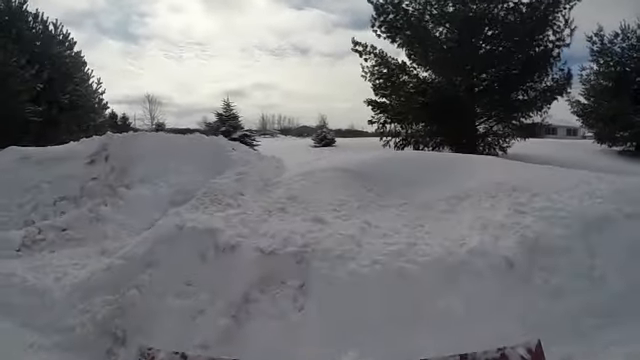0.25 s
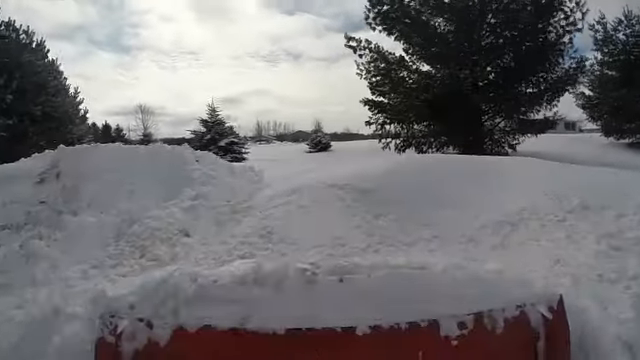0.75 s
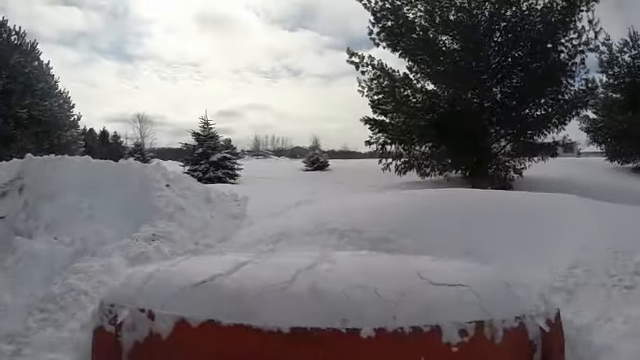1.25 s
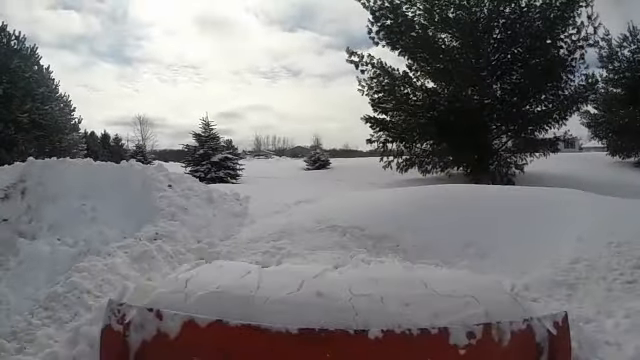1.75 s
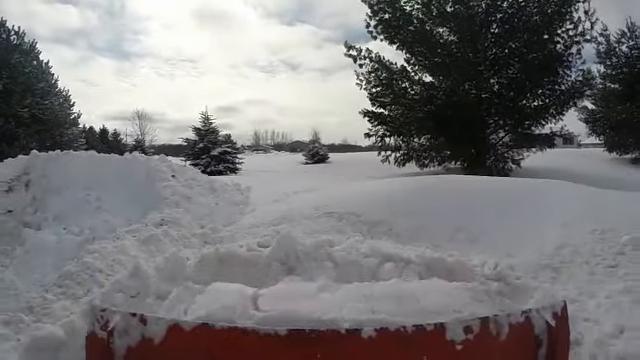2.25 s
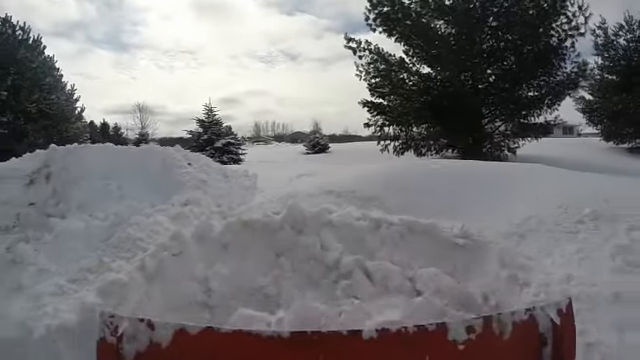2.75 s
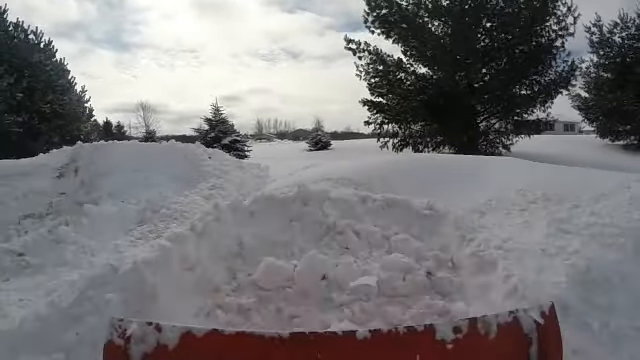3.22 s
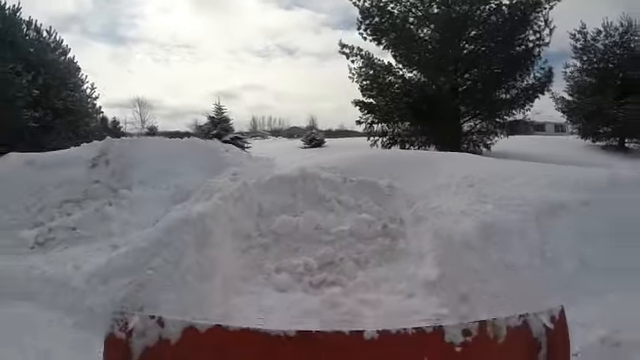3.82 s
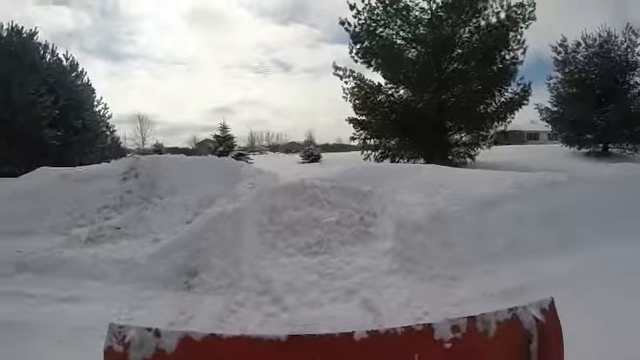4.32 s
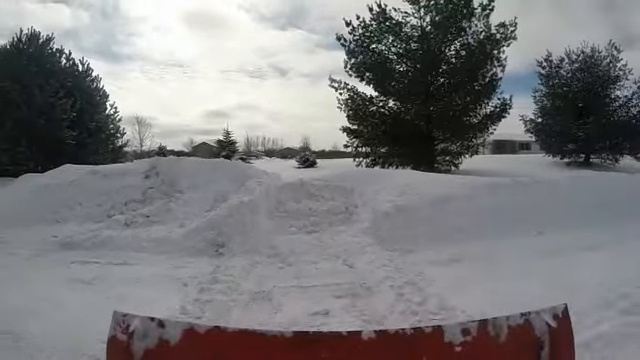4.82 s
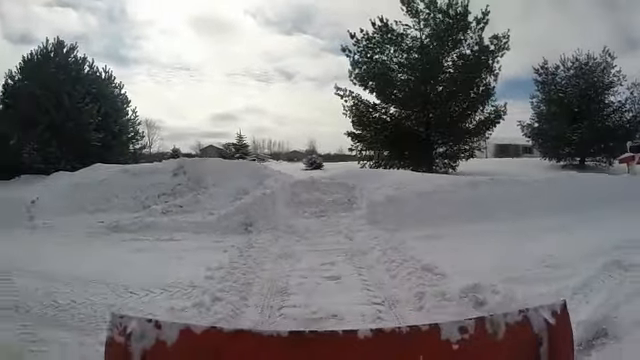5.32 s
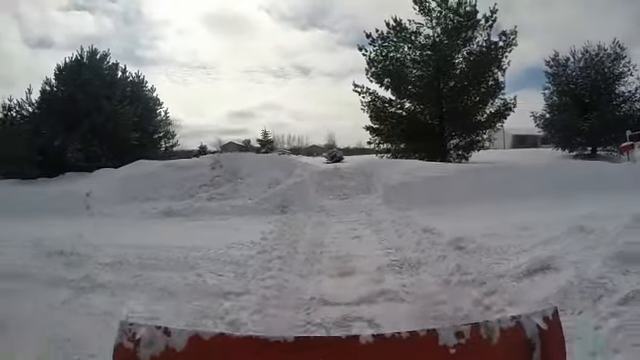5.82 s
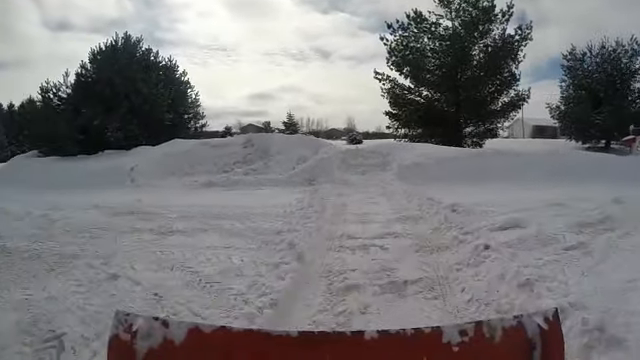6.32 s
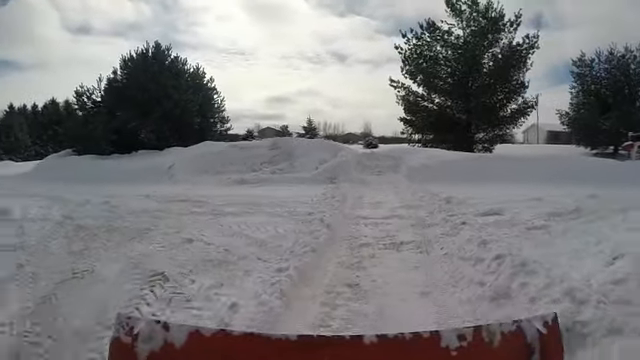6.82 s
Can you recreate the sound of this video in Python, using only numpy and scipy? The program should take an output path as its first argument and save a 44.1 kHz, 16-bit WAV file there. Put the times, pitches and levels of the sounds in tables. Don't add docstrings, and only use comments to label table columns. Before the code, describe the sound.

Continuous diesel drone, close and muffled, with a boomy low end and gritty steel rattle that surges over ruts. A faint narrow hydraulic tone swells now and then. Metal knocks and brief linkage clatter scatter throughout, a few small tinks come early, and dry housing cracks grow denser midway as the machine halts, before it reverses over the snowy lot.

```python
import sys
import numpy as np
from scipy import signal
from scipy.fft import rfft, irfft, next_fast_len
from scipy.io import wavfile
from scipy.ndimage import uniform_filter1d, map_coordinates

SR = 44100
rng = np.random.default_rng(int(sys.argv[2]) if len(sys.argv) > 2 else 0)


def nominal_scale(level):
    x = np.asarray(level, float) / 20
    return 10 ** x


def transcribe(u):
    v = np.clip(np.atleast_2d(u).T, -1, 1)
    q = np.round(v * 32767).astype(np.int16)
    wavfile.write(sys.argv[1], SR, q)


N = 311346
T = np.arange(N) / SR


def unit(x):
    return x / np.sqrt(np.mean(np.abs(x) ** 2) + 1e-20)


def noise():
    return rng.standard_normal(N)


def shape(points):
    hz_points, db_points = np.transpose(points)
    return lambda hz: nominal_scale(np.interp(np.log(hz + 1), np.log(hz_points + 1), db_points))


def modes(table):
    def response(f):
        total = 0
        for k, (centre, width, db) in enumerate(table):
            damping = 1j * f * width
            total = total + (-1) ** k * nominal_scale(db) * damping / (centre * centre - f * f + damping)
        return total
    return response


def filtered(x, response):
    m = next_fast_len(N + SR // 2)
    return unit(irfft(rfft(x, m) * response(np.fft.rfftfreq(m, 1 / SR)), m)[:N])


def wobble(rate):
    return map_coordinates(rng.standard_normal(int(N * rate / SR) + 4), [T * rate])


def swells(rows, rest_db, fall_share):
    total = nominal_scale(rest_db)
    for s, db, half_width in rows:
        width = half_width * np.where(T > s, fall_share, 1)
        total = total + nominal_scale(db) * np.exp(-((T - s) / width) ** 2)
    return 20 * np.log10(total)


def bursts(times, db, t60, rise):
    t = np.arange(SR // 8) / SR
    places = np.minimum(np.round(np.asarray(times) * SR).astype(int), N - 1)
    hits = np.bincount(places, nominal_scale(db), N)
    decay = nominal_scale(-60 * t / t60) * (1 - np.exp(-t / rise))
    return np.abs(signal.fftconvolve(hits, decay)[:N])


def clicks(times, db, colour):
    hits = np.bincount(np.round(np.asarray(times) * SR).astype(int), nominal_scale(db), N)
    out = filtered(hits, shape(colour))
    return out * np.max(np.abs(hits)) / np.max(np.abs(out))


# (time [s], shaft speed [Hz], load [dB], grip of the cab mounts [dB])
ENGINE_RUN = [(0.0, 23.22, 2, -8.5), (0.5, 23.03, 0.5, -11), (0.88, 22.64, 1, -6), (1.1, 22.14, 1.5, -7.5),
              (1.35, 22.37, 2, 2.5), (1.8, 23.43, -1, 2), (2.05, 23.04, -2.5, 6.5), (2.42, 21.51, -1, 0.5),
              (2.7, 21.96, 2, 7.5), (3.08, 21.73, -1, 3), (3.5, 22.01, 1.5, 4.5), (3.96, 21.9, -4, 1),
              (4.4, 22.5, -1, 7.5), (5.0, 22.74, -1, -2), (5.45, 22.62, 2.5, -6), (5.75, 22.55, -3.5, 5),
              (6.3, 22.65, -0.5, 2), (7.06, 22.95, 2, -6)]


def engine():
    s, *columns = np.transpose(ENGINE_RUN)
    return [np.interp(T, s, column) for column in columns]


def crank():
    return np.cumsum(engine()[0]) / SR


def each_turn(angle, per):
    return np.flatnonzero(np.diff(np.floor(per * (crank() - angle)))) / SR


# (time [s], peak level [dB], half width [s])
RUTS = [(0.06, -22.5, 0.25), (0.41, -21, 0.047), (0.59, -23, 0.042), (0.84, -22.5, 0.12),
        (1.08, -30, 0.047), (1.24, -20.5, 0.08), (1.62, -25.5, 0.059), (1.79, -21.5, 0.059),
        (1.99, -26, 0.16), (2.21, -18, 0.023), (2.37, -24, 0.13), (2.65, -33.5, 0.038), (3.04, -22, 0.1),
        (3.36, -26.5, 0.094), (3.58, -22.5, 0.027), (3.79, -19.5, 0.017), (4.0, -23, 0.029),
        (4.23, -20.5, 0.084), (4.47, -27.5, 0.089), (4.64, -18.5, 0.03), (4.8, -24.5, 0.067),
        (5.04, -25, 0.1), (5.2, -33.5, 0.028), (5.37, -22.5, 0.034), (5.71, -18.5, 0.12), (6.02, -19, 0.14),
        (6.28, -24, 0.093), (6.66, -22.5, 0.043), (6.85, -20, 0.12), (7.05, -18.5, 0.033)]


def rut_surge():
    return swells(RUTS, rest_db=-28, fall_share=0.73)


# (frequency [Hz], width [Hz], level [dB])
PANEL_MODES = [(766, 29, -7.5), (837, 29, -2.5), (933, 36, 1), (1164, 27, -2), (1280, 109, 0),
               (1422, 66, 0), (1505, 19, 0.5), (1814, 72, -1.5), (1959, 46, 1.5), (2198, 49, -5.5),
               (2365, 83, -10.5), (2650, 29, -10), (2770, 20, -7), (3004, 100, -16.5), (3499, 65, -14),
               (3750, 70, -22.5)]
# (frequency [Hz], level [dB])
HOUSING_LOSS = [(300, -35.5), (550, -5.5), (750, -0.5), (4000, -1.5), (6300, -5), (6600, -19),
                (9000, -43.5), (16000, -80)]


def panels_heard(f):
    return modes(PANEL_MODES)(f) * shape(HOUSING_LOSS)(f)


# (frequency [Hz], level [dB per Hz])
HOUSING_AIR = [(5000, -40.5), (6500, 2.5), (7500, -2.5), (9000, -6), (10200, -1.5), (11000, -17.5),
               (13000, -21), (14500, -30.5), (16500, -42)]


def housing_hiss():
    return filtered(noise(), shape(HOUSING_AIR))


# (time [s], peak level [dB], half width [s])
DRONE_SWELLS = [
    (1.15, -30.5, 0.19),
    (2.15, -26.5, .15),
    (3.0, -31.5, .3),
    (4.95, -27.5, .3),
    (5.95, -29, 0.36),
    (6.85, -24.5, 0.23),
]


def drone():
    tone = np.sin(2 * np.pi * 296 * T + 1.46 * wobble(5))
    return nominal_scale(swells(DRONE_SWELLS, -40, 0.91) + 2) * tone


# (time [s], peak level [dB], ticks in a row [count])
MOUNT_TICKS = [(0.0488, -46, 1), (0.1346, -49.5, 1), (0.4703, -40, 1), (0.5492, -47, 1), (0.6828, -50, 1),
               (0.9103, -43.5, 4), (1.0914, -42, 1), (1.1368, -42.5, 4), (1.3404, -44.5, 1),
               (1.5513, -46.5, 1), (1.8731, -41.5, 1), (2.185, -42.5, 1), (2.3461, -46.5, 1),
               (2.4129, -44, 1), (3.192, -45.5, 1), (3.4625, -46, 1), (3.601, -41, 1), (3.7813, -48, 1),
               (3.8701, -46, 1), (3.9853, -47, 1), (4.2734, -41.5, 1), (4.3949, -47.5, 1),
               (4.4498, -43.5, 1), (4.4952, -45, 1), (4.5456, -49.5, 1), (5.0095, -45.5, 1),
               (5.1547, -46, 1), (5.6665, -42, 1), (6.4273, -40, 1), (6.5445, -47.5, 1)]


def treble():
    gap_s = .0238
    s, db = np.transpose([(s + k * gap_s, db) for s, db, count in MOUNT_TICKS for k in range(round(count))])
    valve, shake = each_turn(0.086, per=0.87), each_turn(.3, per=5)

    hiss = nominal_scale(-79.5 + 2.5 * wobble(22) + 2.5 * wobble(3.7))
    valve_db = -65 + 3 * rng.standard_normal(len(valve))
    hiss = hiss + bursts(valve, valve_db, t60=0.076, rise=.001)

    shake_db = -71 + 5 * rng.standard_normal(len(shake))
    crackle = bursts(shake + rng.uniform(0, .008, len(shake)), shake_db, t60=0.018, rise=.0002)
    tick = nominal_scale(-4.0) * bursts(s, db, t60=0.0077, rise=0.00012) + crackle
    tick_colour = shape([(5000, -32.0), (7000, -3.5), (10000, 1.5), (13000, -7.5), (16000, -19)])
    return hiss * housing_hiss() + tick * filtered(noise(), tick_colour)


# (time [s], peak level
# [dB])
DRY_SNAPS = [(0.0159, -49), (0.0488, -54.5), (0.1356, -65), (0.1511, -61), (0.3092, -69.5),
             (0.3242, -64), (0.3825, -56.5), (0.4698, -50), (0.5157, -56), (0.5492, -48.5),
             (0.6828, -47.5), (0.7163, -50), (0.9103, -54), (0.9338, -50), (0.9592, -54.5),
             (0.9822, -53), (1.0166, -56), (1.0774, -65), (1.0909, -53), (1.1129, -56.5), (1.1363, -54),
             (1.1593, -57), (1.1832, -51.5), (1.2361, -59.5), (1.28, -58), (1.3404, -53),
             (1.5504, -50.5), (1.6761, -58), (1.7379, -57), (1.8507, -52), (1.8731, -55),
             (2.1844, -49.5),
             (2.3457, -52.5), (2.3886, -58.5), (2.4126, -57.5), (2.424, -57), (2.436, -52),
             (2.4565, -53), (2.5178, -65), (2.5513, -60), (2.6251, -57.5), (2.6555, -64), (2.685, -57),
             (2.7149, -60), (2.7458, -62.5), (2.7857, -63.5), (2.8516, -57.5), (2.8805, -61),
             (2.885, -52.5), (2.9738, -60.5), (3.0182, -51), (3.0526, -63.5), (3.0985, -59.5),
             (3.122, -61.5), (3.1674, -57.5), (3.1923, -53), (3.2187, -52), (3.2362, -60.5),
             (3.339, -65), (3.3517, -57), (3.3854, -60), (3.4298, -62.5), (3.4622, -53),
             (3.4873, -59.5), (3.5191, -67.5), (3.567, -62), (3.6004, -50), (3.6722, -60),
             (3.7006, -66.5), (3.781, -53.5), (3.8039, -56.5), (3.8528, -52), (3.8703, -56.5),
             (3.9281, -65.5), (3.973, -62.5), (3.985, -57.5), (4.007, -57), (4.0528, -57.5),
             (4.1022, -58.5), (4.1287, -58.5), (4.186, -54.5), (4.2195, -53), (4.2723, -54.5),
             (4.3227, -58), (4.3781, -64.5), (4.3946, -53), (4.4494, -54.5), (4.4734, -60.5),
             (4.4953, -53), (4.5238, -61.5), (4.5452, -62.5), (4.6869, -54),
             (4.6868, -53), (4.72, -60), (4.8534, -48), (4.8869, -55), (4.9173, -61), (5.0206, -51.5),
             (5.054, -54.5), (5.1548, -55), (5.1787, -58.5), (5.3546, -51.5), (5.4167, -54.5),
             (5.4915, -57), (5.5209, -51.5), (5.5543, -54), (5.6102, -62.5), (5.6666, -53),
             (5.6875, -59), (5.7095, -56.5), (5.8432, -66), (6.0213, -53), (6.0547, -60.5),
             (6.1111, -61.5), (6.3884, -58.5), (6.4084, -69), (6.4269, -54.5), (6.4782, -58.5),
             (6.5441, -62.5), (6.5551, -50), (6.6888, -52.5), (6.8629, -60.5), (6.8689, -53.5),
             (7.0225, -51)]


def snaps():
    s, db = np.transpose(DRY_SNAPS + [(0.0005, -39.5)])
    half = each_turn(.2, per=2)
    buzz_db = -62 + 4 * wobble(2.9)[(half * SR).astype(int)] + 3.5 * rng.standard_normal(len(half))
    cracks = clicks(s, db + 16, [(4000, -31), (7000, -6.5), (12000, -3.5), (16500, 0.0)])
    buzz = clicks(half, buzz_db, [(6000, -26.5), (8500, -6), (10200, 3.0), (13000, -3.5), (16000, -23.0)])
    return cracks + buzz


# (time [s], peak level [dB], ringing mode [Hz])
HARD_KNOCKS = [(0.6827, -12, 1880), (0.9242, -22, 1940), (1.0773, -7, 1280), (1.1986, -11, 1260),
               (1.9853, -7, 1404), (2.0257, -10.5, 1215), (2.3649, -9.5, 1960), (2.9561, -13, 1345),
               (3.4809, -16, 1920), (3.5717, -7, 1505), (4.1319, -11, 1970), (4.358, -11, 1300),
               (4.4382, -15, 936.8), (4.6318, -10, 1280), (5.8979, -11, 1950), (5.9543, -10, 1871),
               (6.8667, -10.5, 900), (7.0168, -15, 1218)]
# (time [s], peak level [dB], frequency [Hz], t60 [s])
SMALL_TINKS = [
    (1.615, -19, 2800, .07),
    (1.787, -16, 2900, .012),
    (1.788, -19, 3300, .015),
    (1.985, -26, 3500, .06),
    (1.545, -21, 1500, .05),
]


def knocks():
    out, t = np.zeros(N + SR), np.arange(SR // 8) / SR
    rings = [(s, db - 5, hz, .035) for s, db, hz in HARD_KNOCKS]
    for s, db, hz, t60 in rings + SMALL_TINKS:
        envelope = nominal_scale(db - 60 * t / t60) * (1 - np.exp(-t / 0.00023))
        out[round(s * SR):][:len(t)] += envelope * np.sin(2 * np.pi * hz * t)
    s, db, _ = np.transpose(HARD_KNOCKS)
    puff = filtered(noise(), panels_heard)
    return out[:N] + nominal_scale(-14.5) * bursts(s, db, t60=0.074, rise=0.00055) * puff


# (time [s], peak level [dB])
LINK_LANDINGS = [(0.1546, -19.5), (0.3258, -26), (0.4105, -26.5), (0.4968, -31.5), (0.5433, -21.5),
                 (0.684, -21.5), (0.9832, -28.5), (1.0728, -25.5), (1.209, -28), (1.249, -28), (1.296, -20),
                 (1.341, -22), (1.4303, -24.5), (1.475, -28), (1.7876, -25.5), (1.9884, -28), (2.3037, -31),
                 (2.4426, -23.5), (2.4706, -26), (2.588, -33), (2.628, -24), (2.7652, -26), (3.0394, -26.5),
                 (3.1564, -33), (3.2916, -32.5), (3.3852, -30), (3.4008, -33), (3.4291, -25),
                 (3.4796, -32.5), (3.5658, -28.5), (3.806, -25), (3.8364, -26.5), (3.927, -35.5),
                 (3.9427, -26), (3.9898, -23.5), (4.2193, -24.5), (4.3358, -30.5), (4.951, -28.5),
                 (4.9671, -22), (4.9945, -31.5), (5.011, -19.5), (5.1866, -22.5), (5.3183, -28),
                 (5.3465, -28), (5.4082, -23.5), (5.477, -30), (5.4924, -21.5), (5.5405, -28.5),
                 (5.7239, -21.5), (5.766, -34.5), (5.983, -26), (6.3425, -31), (6.542, -29), (6.577, -23),
                 (6.645, -20), (6.8653, -19.5), (6.9137, -30.5), (6.9987, -33.5)]
# (frequency [Hz], level [dB per Hz])
LINK_STEEL = [(1290, -26.5), (2200, 6.5), (2430, -8), (2900, 1.5), (3180, -8), (3450, 1), (4150, -11.5),
              (4470, -0.5), (4950, -22.5), (5210, -12.5), (5420, -13), (5900, -25), (6300, -23),
              (8190, -57.5), (13900, -120)]


def clatter():
    s, db = np.transpose(LINK_LANDINGS)
    turn = each_turn(0.45, per=1)
    rattle_db = -41 + 5 * np.tanh(rng.standard_normal(len(turn)))
    landing = bursts(s, db, t60=0.039, rise=0.00017)
    bounce = bursts(s + 0.0055, db - 10.5, t60=0.074, rise=0.00071)
    rattle = bursts(turn, rattle_db, t60=0.064, rise=0.00055)
    steel = filtered(noise(), shape(LINK_STEEL)) + nominal_scale(-31.5) * housing_hiss()
    return nominal_scale(-1.5) * (landing + bounce + rattle) * steel


# (time [s], peak level [dB], half width [s])
FRAME_SWELLS = [(0.08, -19, 0.047), (0.22, -20.5, 0.037), (0.48, -15, .05), (0.66, -37, 0.042),
                (0.84, -18, .05), (0.93, -19, .05), (1.09, -20, 0.098), (1.35, -23.5, 0.071),
                (1.63, -24, 0.072), (1.79, -21.5, .05), (2.03, -25, .1), (2.25, -20.5, 0.061),
                (2.47, -15.5, .12), (2.72, -19, .08), (2.98, -18.5, 0.11), (3.17, -20, 0.11),
                (3.44, -20, .06), (3.6, -19.5, .06), (3.8, -22.5, 0.085), (4.04, -17.5, 0.06),
                (4.3, -19, 0.078), (4.49, -19, 0.058), (4.86, -18, .08), (5.18, -17.5, .06),
                (5.41, -15.5, 0.047), (5.7, -21.5, 0.29), (6.05, -19.5, 0.17), (6.52, -17, 0.054),
                (6.74, -21, 0.078), (6.96, -19.5, 0.16)]


def rocking():
    mount = signal.hilbert(filtered(noise(), lambda f: modes([(40.5, 4, 0)])(f) ** 2))
    both = np.exp(4j * np.pi * crank()) + nominal_scale(-4.0) * mount
    steadied = np.real(both / (np.abs(both) + 0.21))
    sway = nominal_scale(swells(FRAME_SWELLS, -30.5, 1)) * steadied
    return nominal_scale(-21.0) * filtered(sway, lambda f: np.abs(modes([(43, 24, 0)])(f)) ** 2)


# (time [s], peak level [dB])
HARD_FIRINGS = [(0.103, -8.5), (0.222, -1.5), (0.256, -13.5), (0.438, -7), (0.475, -10.5), (0.574, -2),
                (0.695, -6.5), (1.07, -11), (1.23, -6), (1.41, -8), (1.452, -9), (1.489, -13), (1.629, -17),
                (1.899, -6.5), (1.999, -7), (2.071, -3.5), (2.106, -6.5), (2.191, -13.5), (2.243, -3),
                (2.601, -11.5), (2.65, -9.5), (2.828, -4), (2.967, -5.5), (3.092, -10.5), (3.33, -0.5),
                (3.597, -11), (3.733, -2), (3.865, 0), (3.962, -20), (4, -7), (4.048, -16), (4.1, -25),
                (4.185, -6.5), (4.228, -12.5), (4.323, -12.5), (4.387, -0.5), (4.498, -15), (4.591, -15),
                (4.632, -7), (4.669, -1), (4.729, -5.5), (4.811, -4.5), (4.854, -18), (4.924, -7),
                (5.057, 1), (5.147, -2), (5.203, -7), (5.3, -16), (5.338, -10), (5.422, -14.5), (5.667, -2),
                (5.727, -7), (5.916, -6.5), (5.973, -11.5), (6.086, -12), (6.182, -4), (6.307, -10.5),
                (6.355, -13.5), (6.406, -10.5), (6.447, -6)]


def thumping():
    lull_db, lull_s, lead_s = 8, 0.0049, 0.0069
    steady_share = 0.87
    s, db = np.transpose(HARD_FIRINGS)
    lull = sum(np.exp(-((T - a + lead_s) / lull_s) ** 2) for a in s)
    swell = nominal_scale(-4.0) * bursts(s, db + 8.5, t60=0.12, rise=0.009)
    return nominal_scale(-lull_db * lull) * (steady_share + swell)


def levelled(x):
    evenness = 0.43
    quick, slow = (uniform_filter1d(np.abs(x), size=SR // n) for n in (60, 5))
    return x * (slow / (quick + .15 * slow)) ** evenness


# (multiple of shaft speed [ratio], level [dB])
STEADY_ORDERS = [(1, -47), (3, -48), (5, -44), (10, -43.5), (11, -45), (12, -45.5), (14, -40.5)]
# (level at mid speed [dB], slope [dB per Hz of speed], share [dB per dB of grip], drift [dB])
RESONANT_ORDERS = [
    (-30, 1.5, -0.28, 1.5),
    (-25, 1.5, -0.5, 2),
    (-24, -0.5, 1, 1),
    (-38.5, -9, -0.1, 3.5),
    (-26.5, 1, -0.05, 2.5),
    (-28, -0.7, -0.2, 1.9),
    (-39, 1.5, -0.06, 2),
]


def hum():
    pump = 6.64
    multiples = (4, 7, 8, 6, pump, 9, 13)
    speed, _, grip = engine()
    orders = []
    for k, (db, slope, share, drift) in zip(multiples, RESONANT_ORDERS):
        orders.append((k, db + slope * (speed - 22.5) + share * grip + drift * wobble(4.1)))
    for k, db in STEADY_ORDERS:
        orders.append((k, db + 3 * wobble(2.2)))
    turns, total = crank(), 0
    for k, db in orders:
        phase = 0.033 * k * wobble(3.7) + rng.uniform(0, 2 * np.pi)
        total = total + nominal_scale(db + 4) * np.sin(2 * np.pi * k * turns + phase)
    return total


# (frequency [Hz], level [dB per Hz])
CAB_BOOM = [(20, -26), (40, -8), (60, -23), (100, -24), (130, -14), (150, -6), (175, -2.5), (205, -5),
            (240, -19), (275, -13.5), (350, -27), (480, -31.5), (700, -37.5), (1200, -91.5)]
# (frequency [Hz], width [Hz], level [dB])
CAB_RESONANCES = [(287, 7.8, -10.5), (324, 28, -14.5), (372, 14, -20.5), (410.7, 22, -20), (471, 20, -22)]


def boom():
    push = (1 + 0.12 * np.cos(2 * np.pi * crank())) * noise()

    def cab(f):
        ringing = np.abs(modes(CAB_RESONANCES)(f)) * (f > 250) / (1 + (f / 650) ** 6)
        return np.hypot(shape(CAB_BOOM)(f), ringing)

    effort_db = 0.81 * engine()[1] + 0.4 * (rut_surge() + 26)
    return nominal_scale(effort_db - 18.5) * filtered(push, cab)


def roar_dips():
    depth_db, width_s = 2.5, 0.0042
    gaps = sum(np.exp(-((T - s) / width_s + 1) ** 2) for s, *_ in HARD_KNOCKS + LINK_LANDINGS)
    return nominal_scale(-depth_db * gaps)


# (frequency [Hz], width [Hz], level [dB])
COVER_MODES = [(3480, 47, 3), (4100, 61, -11.5), (4356, 110, -6), (4730, 72, -12.5), (5260, 160, -9),
               (5590, 110, -10.5), (6080, 180, -18.5)]
# (frequency [Hz], level [dB per Hz])
BETWEEN_MODES = [(450, -35), (600, -19), (1050, -10.5), (1700, -10.5), (2500, -14), (3300, -24),
                 (4200, -31), (5050, -43.5), (6000, -48), (6600, -48), (9000, -89.5)]


def roar():
    fire = each_turn(.1, per=4)
    size = rng.standard_normal((len(fire), 3))
    fire = np.abs(fire + .003 * size[:, 2])
    knock = bursts(fire, 1.5 + 1.2 * np.tanh(size[:, 0]), t60=.028, rise=.0005)
    chatter = bursts(fire, 3 + 5 * size[:, 1], t60=0.072, rise=0.00046)

    def drive(blows):
        return (1 + blows) * nominal_scale(2.0 * np.tanh(wobble(150))) * noise()

    panels = filtered(drive(knock), panels_heard)
    panels = panels + nominal_scale(-4.5) * filtered(drive(knock), shape(BETWEEN_MODES))
    edges = shape([(2800, -30.0), (3400, 0.5), (6350, 3.5), (6700, -21.5), (9000, -47.0), (16000, -76.5)])
    covers = filtered(drive(chatter), lambda f: modes(COVER_MODES)(f) * edges(f))
    effort_db = 0.51 * (rut_surge() + 23) + 0.63 * engine()[1]
    return nominal_scale(effort_db - 25.5) * (panels + nominal_scale(-22.5) * covers)


def scene():
    cab = thumping() * levelled(hum() + boom())
    steel = roar_dips() * roar() + clatter() + knocks()
    close = treble() + snaps()
    return (cab + rocking() + steel + close + drone())[None]


def low_pass(x):
    return signal.sosfilt(signal.butter(12, 15800, fs=SR, output="sos"), x)


def record(dry):
    ending = np.clip((N / SR - T) / .004, 0, 1)
    capsule = dry / (1 + np.abs(dry / .92) ** 6) ** (1 / 6)
    return low_pass(ending * capsule)


dry = scene()
out = record(dry)
transcribe(out)
```